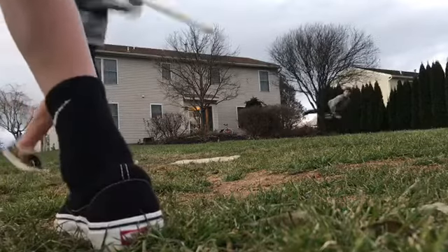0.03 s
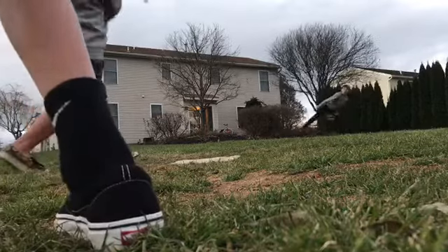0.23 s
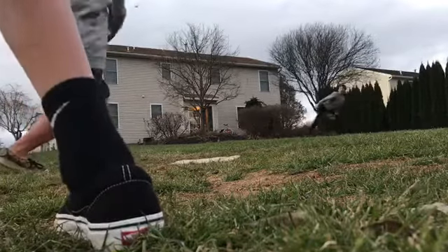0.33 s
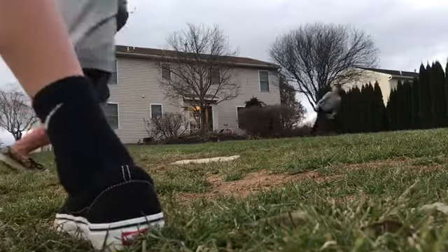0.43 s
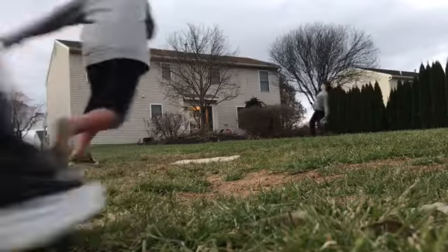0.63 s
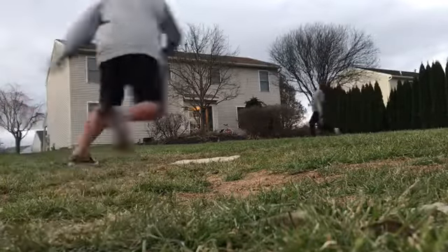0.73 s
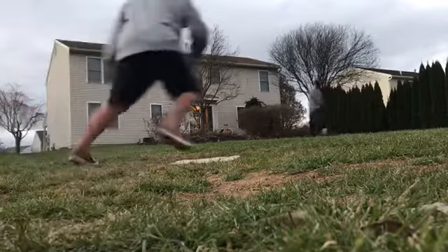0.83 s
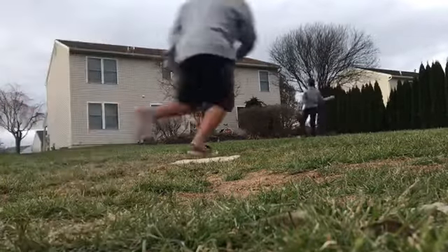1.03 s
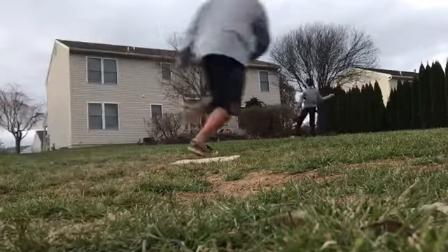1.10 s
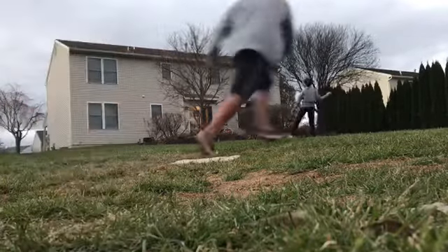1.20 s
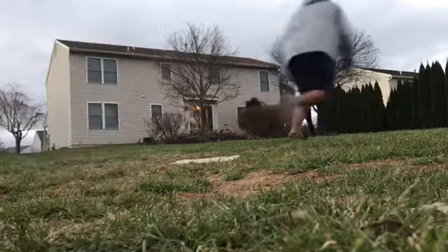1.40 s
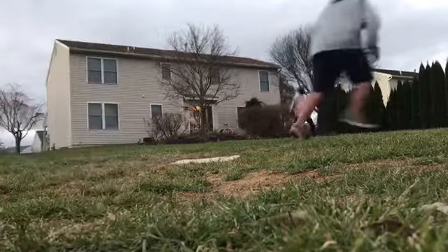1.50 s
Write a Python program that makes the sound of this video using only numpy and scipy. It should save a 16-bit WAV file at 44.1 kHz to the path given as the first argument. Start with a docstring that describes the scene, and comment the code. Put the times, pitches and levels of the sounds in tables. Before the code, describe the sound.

Sharp crack of a hollow plastic bat hitting a ball, followed by running steps on grass.

```python
"""A hollow plastic bat swishes and cracks against a ball: contact click, ringing modes, shell rattle.
Backyard walls throw the crack back. The batter scuffs through the grass and runs off with soft thuds,
past a small microphone lying on the lawn.
Underneath: distant outdoor noise, a low flutter of air and a thin hiss."""
import sys
import numpy as np
from scipy import signal
from scipy.fft import rfft, irfft
from scipy.io import wavfile

SR = 44100
rng = np.random.default_rng(int(sys.argv[2]) if len(sys.argv) > 2 else 0)


def pcm_store(signal):
    """Save signal as 16-bit PCM."""
    levels = np.round(np.clip(np.atleast_2d(signal), -1, 1) * 32767)
    wavfile.write(sys.argv[1], SR, levels.astype(np.int16).T)


N = 68355
TIME_S = np.arange(N) / SR
HIT_S = 0.2035


def amp(db):
    """Decibels to gain."""
    return 10 ** (np.asarray(db) / 20)


def unit_rms(x):
    """Scale to rms 1."""
    return x / np.sqrt(np.mean(x ** 2) + 1e-20)


def colour_db(colour, hz):
    """Interpolate (freq_hz, gain_db) points on a log-frequency axis."""
    freq_hz, gain_db = np.transpose(colour)
    return np.interp(np.log(hz + 1), np.log(freq_hz + 1), gain_db)


def tinted(x, colour, tilt_db_per_oct=0):
    """Apply a colour, tilted around 1 kHz; rms 1."""
    hz = np.fft.rfftfreq(N, 1 / SR)
    octaves = np.log2(np.maximum(hz, 250) / 1000)
    gain = amp(colour_db(colour, hz) + tilt_db_per_oct * octaves)
    return unit_rms(irfft(rfft(x) * gain, N))


def noise(colour, tilt_db_per_oct=0):
    """Coloured noise; rms 1."""
    return tinted(rng.standard_normal(N), colour, tilt_db_per_oct)


def causal_filter(x, colour, size=8192):
    """Minimum-phase filter: ringing follows its cause."""
    log_gain = np.log(amp(colour_db(colour, abs(np.fft.fftfreq(size, 1 / SR)))))
    taps = np.fft.ifft(np.exp(np.conj(signal.hilbert(log_gain)))).real
    return signal.fftconvolve(x, taps[:size // 2])[:N]


def decay(start_s, t60_s, rise_s=1 / SR):
    """Envelope: linear rise, exponential decay."""
    age_s = np.maximum(TIME_S - start_s, 0)
    return np.minimum(age_s / rise_s, 1) * amp(-60 * age_s / t60_s)


def swell(peak_s, rise_s, fall_s):
    """Envelope: Gaussian with a separate width each side."""
    width_s = np.where(TIME_S < peak_s, rise_s, fall_s)
    return np.exp(-0.5 * ((TIME_S - peak_s) / width_s) ** 2)


def drift():
    """Random wander, 2-20 Hz; rms 1."""
    rates_hz = np.geomspace(2, 20, 16)
    return unit_rms(sum(np.sin(2 * np.pi * (hz * TIME_S + rng.random())) / np.sqrt(hz) for hz in rates_hz))


def hiss():
    """Thin hiss, raised for 0.4 s after the crack."""
    colour = [(100, -5), (4000, 3), (8000, -0.5), (12000, -2), (15300, 2), (15900, -2), (16300, -33.5)]  # freq_hz, gain_db
    levels = [(.2, -73), (.21, -64.5), (.39, -68), (.42, -65), (.608, -65), (.62, -76.5)]  # time_s, level_db
    return noise(colour) * amp(np.interp(TIME_S, *np.transpose(levels)))


def outdoors():
    """Wavering distant noise; air fluttering over the lawn."""
    # spectra: freq_hz, gain_db
    distant_colour = [(20, -12), (150, 2), (300, 1), (500, -3.5), (1000, 0.5), (1700, -5), (2800, -6),
                      (5000, -20), (16000, -23.5)]
    flutter_colour = [(10, -13.5), (30, -7.5), (65, -5), (110, -1.5), (200, -18), (500, -36), (2000, -73)]
    return noise(distant_colour) * amp(-55 + 1.5 * drift()) + noise(flutter_colour) * amp(-51)


def crunch(grains_per_s=3500, spread_db=2.5, rub_gain=0.61):
    """Tiny clicks of grass blades over smooth rubbing."""
    sizes = amp(spread_db * np.minimum(rng.exponential(1, N), 4)) * rng.choice([-1, 1], N)
    clicks = sizes * (rng.random(N) < grains_per_s / SR)
    return unit_rms(clicks) + rub_gain * rng.standard_normal(N)


def scuffs():
    """Shoes and clothes brush through the grass."""
    strokes = [(.735, -45.5, 0.043, 0.038, -1.5), (0.883, -28, 0.013, 0.023, 0.5),
               (.901, -31.5, 0.0099, 0.0098, 1.5), (0.944, -47.5, 0.016, 0.045, 0.5),
               (1.274, -49, 0.016, 0.028, -3), (1.3, -48.5, 0.016, 0.0095, -3)]  # peak_s, level_db, rise_s, fall_s, tilt_db_per_oct
    colour = [(100, -10.5), (500, -11.5), (900, -8.5), (1600, 0.5), (2800, 3.5), (4200, -3.5), (7000, -15),
              (10500, -11), (13000, -18.5), (16000, -26.5)]  # freq_hz, gain_db
    return sum(amp(db) * tinted(crunch(), colour, tilt) * swell(peak_s, rise_s, fall_s)
               for peak_s, db, rise_s, fall_s, tilt in strokes)


def steps():
    """Soles crush the turf."""
    crushes = [(1.071, -36.5, .002, 0.0018, -0.5), (1.078, -39.5, .003, 0.025, -6.5),
               (1.085, -37, 0.0014, 0.0039, -1), (1.104, -44.5, 0.0034, 0.0053, -7),
               (1.394, -41.5, 0.011, .015, 3), (1.396, -37, 0.00069, 0.0058, 0.5),
               (1.417, -37.5, 0.00088, 0.003, -1.5), (1.533, -48.5, .003, 0.0033, 6)]  # peak_s, level_db, rise_s, fall_s, tilt_db_per_oct
    colour = [(60, 5.5), (200, -1), (400, 1), (850, 1), (1600, -2.5), (2400, -7.5), (4000, -31),
              (16000, -43)]  # freq_hz, gain_db
    return sum(amp(db) * tinted(crunch(), colour, tilt) * swell(peak_s, rise_s, fall_s)
               for peak_s, db, rise_s, fall_s, tilt in crushes)


def thuds():
    """Weight lands on the soil in short, low pulses."""
    landings = [(0.028, -41.5, 44.4, 0.022), (.562, -40.5, 75.6, 0.011), (0.633, -29, 59, 0.0097),
                (.896, -33, 193, 0.0046), (.897, -39, 104, 0.021), (0.961, -30.5, 51.5, 0.0068),
                (1.024, -38, 59, 0.011), (1.09, -42, 137, 0.016), (1.114, -33, 72.5, 0.015),
                (1.164, -36.5, 64.4, 0.013), (1.202, -39, 53.6, 0.019), (1.33, -43.5, 78, 0.017),
                (1.454, -40.5, 78, .009)]  # peak_s, level_db, pitch_hz, width_s
    return sum(-amp(db) * swell(peak_s, width_s, width_s) * np.cos(2 * np.pi * hz * (TIME_S - peak_s))
               for peak_s, db, hz, width_s in landings)


def snaps():
    """Grass stalks snap underfoot."""
    stalks = [(0.1596, -44, 4), (0.795, -40, 4), (.916, -30, 1.5), (.9685, -30.5, 0)]  # start_s, level_db, tilt_db_per_oct
    colour = [(200, -1), (800, 1), (1500, -7), (3000, 8), (4000, -6), (6000, -11), (16000, -14)]  # freq_hz, gain_db
    return sum(amp(db) * noise(colour, tilt) * decay(start_s, t60_s=0.011) for start_s, db, tilt in stalks)


def yard_echoes():
    """Walls, fence and trees scatter the crack back as dull noise tails."""
    echoes = [(.021, -31, 0.0037, 0.14, -5.5), (.045, -39, 0.015, .25, -5.5), (.11, -48.5, 0.01, 1.1, -3)]  # delay_s, level_db, rise_s, t60_s, tilt_db_per_oct
    colour = [(100, -8.5), (500, -18), (1200, 2), (2000, 2), (2800, 0), (4000, -5.5), (16000, -16)]  # freq_hz, gain_db
    return sum(amp(db) * noise(colour, tilt) * decay(HIT_S + delay_s, t60_s, rise_s)
               for delay_s, db, rise_s, t60_s, tilt in echoes)


def swish(peak_db=-33, rise_db_per_s=244, fall_db_per_s=895.5):
    """Air rushes round the bat, loudest at contact."""
    colour = [(40, -1), (130, 4.5), (270, 1.5), (450, -11.5), (900, -10), (2000, -13.5), (6000, -23.5),
              (16000, -38)]  # freq_hz, gain_db
    lead_s = HIT_S - TIME_S
    return noise(colour) * amp(peak_db - np.maximum(lead_s * rise_db_per_s, -lead_s * fall_db_per_s))


def crack(contact_s=0.00029, low_cut_hz=168):
    """Contact clicks, bat and ball ring, the thin shell rattles; both are too small to radiate bass."""
    modes = [(237, -24, 0.04), (333, -29, 0.032), (917, -18, 0.029), (1096, -28.5, 0.18),
             (1213, -25, 0.055), (1374, -9.5, 0.018), (1628, -7.5, .047), (1761, -18, 0.038),
             (2600, -41, 0.043)]  # pitch_hz, gain_db, t60_s
    reflections = [(.00276, -4), (.00596, -5.5), (.00686, -7)]  # off nearby players: delay_s, gain_db
    # spectra: freq_hz, gain_db
    click_colour = [(100, -4), (500, -34), (1500, 0), (3000, -3), (4200, 14), (8000, 6.5), (13000, 2),
                    (16000, 0)]
    shell_colour = [(100, 9), (1200, 1.5), (1850, -25), (2300, 1.5), (4000, -3), (8000, -0.5), (16000, -9)]
    after_ring_colour = [(100, -21), (1900, -9), (2600, 5), (2950, 8), (3300, -16), (4800, -12),
                         (5750, 0.5), (6600, -11), (16000, -12)]
    release_s = HIT_S + contact_s  # ring starts as the ball leaves
    ring = amp(0.5) * sum(amp(db) * decay(release_s, t60_s) * np.sin(2 * np.pi * hz * (TIME_S - release_s))
                          for hz, db, t60_s in modes)
    bounces = sum(amp(db) * np.interp(TIME_S - delay_s, TIME_S, ring) for delay_s, db in reflections)
    impulse = np.sinc((TIME_S - HIT_S) * SR) * (abs(TIME_S - HIT_S) < 2 / SR)
    click = amp(9.5) * causal_filter(impulse, click_colour)
    rattle = amp(-7) * noise(shell_colour) * decay(HIT_S, t60_s=0.024)
    after_ring = amp(-24) * noise(after_ring_colour) * decay(HIT_S + 0.02, t60_s=0.054, rise_s=0.00073)
    radiation = signal.butter(2, low_cut_hz, "high", fs=SR)
    return signal.lfilter(*radiation, ring + bounces - click + rattle + after_ring)


def scene():
    """Swing, crack, echoes and run in the open air; mono."""
    hit = swish() + crack() + yard_echoes()
    runner = scuffs() + steps() + thuds() + snaps()
    return (hit + runner + outdoors())[None]


def record(dry):
    """Microphone colour, hiss, soft overload, band limit."""
    mic_colour = [(20, -5.5), (500, -0.5), (1000, 0), (1550, 2), (1850, 7.5), (2060, -12.5), (2400, -12.5),
                  (2850, -2), (3500, -13), (4800, -19), (6000, -13.5), (8700, -22), (10200, -33),
                  (12500, -22.5), (16000, -28.5)]  # port and case resonances: freq_hz, gain_db
    ceiling, cutoff_hz = 1.34, 16500
    picked_up = causal_filter(dry[0], mic_colour) + hiss()
    clipped = ceiling * np.tanh(picked_up / ceiling)
    lowpass = signal.firwin(255, cutoff_hz, window=("kaiser", 9), fs=SR)
    return signal.fftconvolve(clipped, lowpass, "same")[None]


dry = scene()
out = record(dry)
pcm_store(out)
```